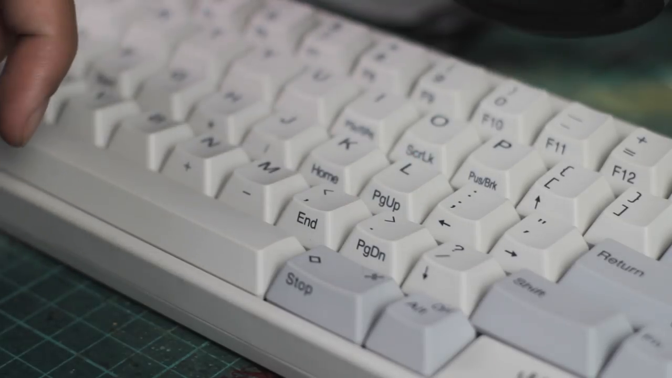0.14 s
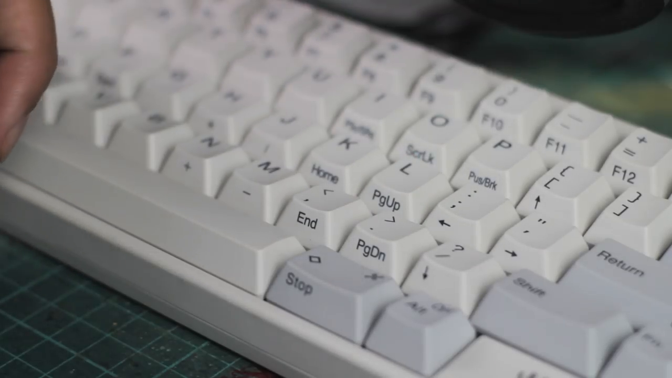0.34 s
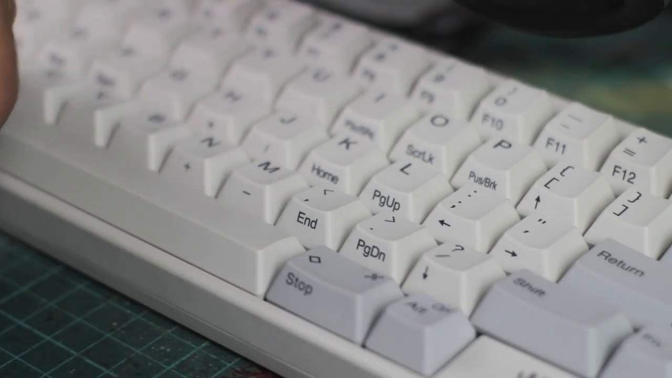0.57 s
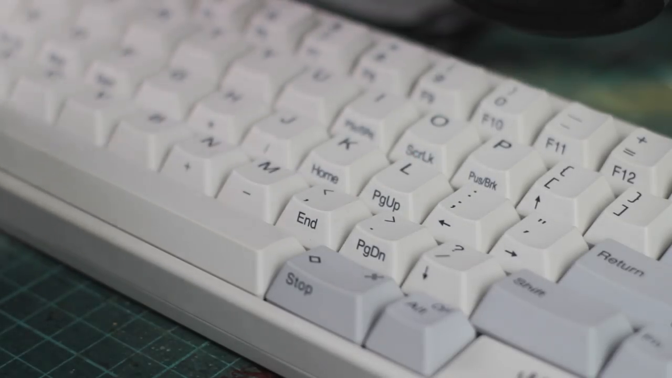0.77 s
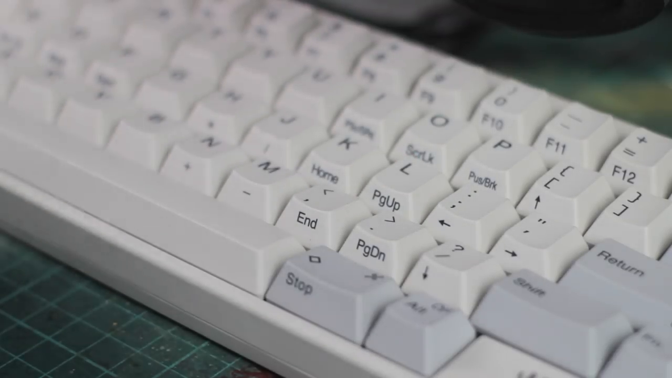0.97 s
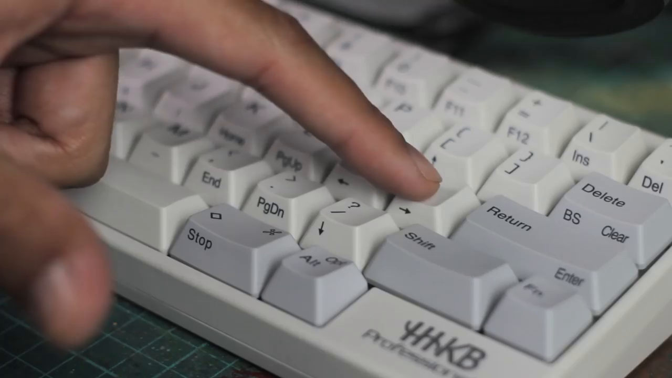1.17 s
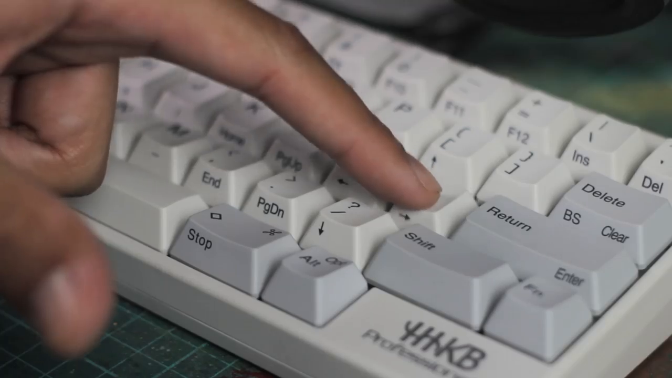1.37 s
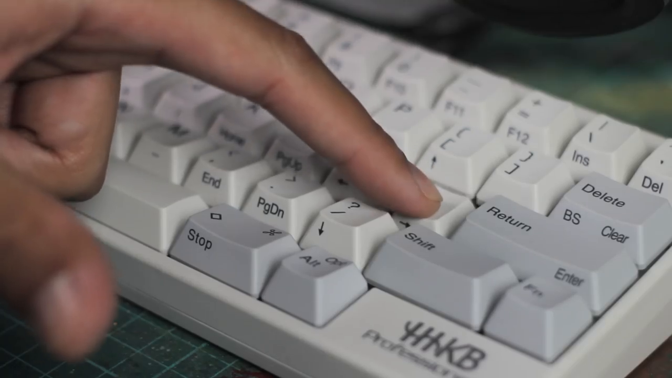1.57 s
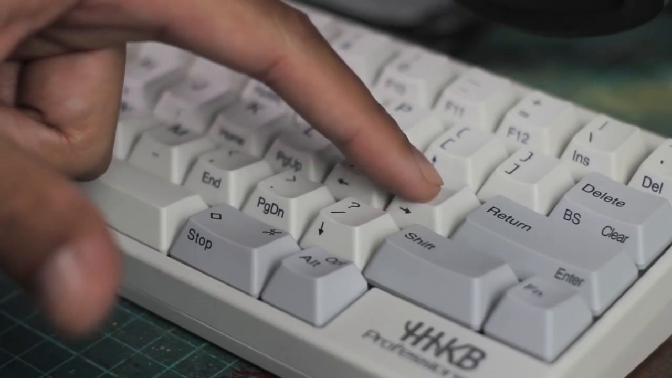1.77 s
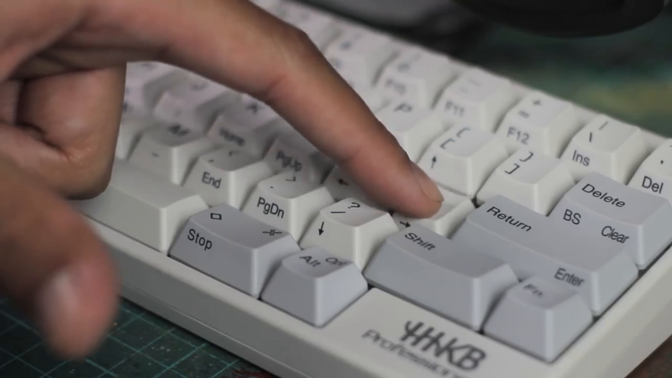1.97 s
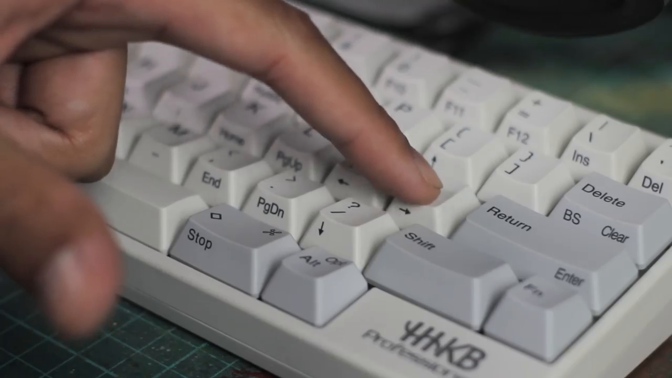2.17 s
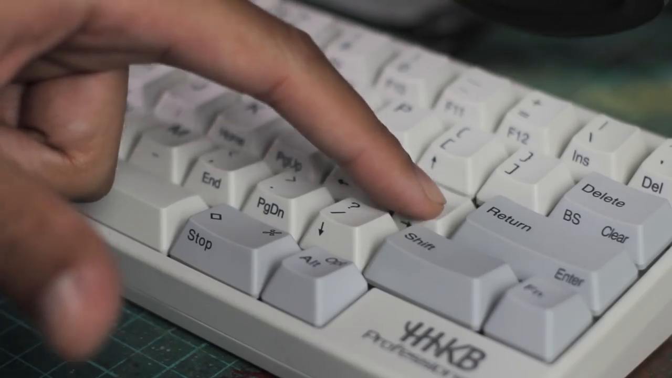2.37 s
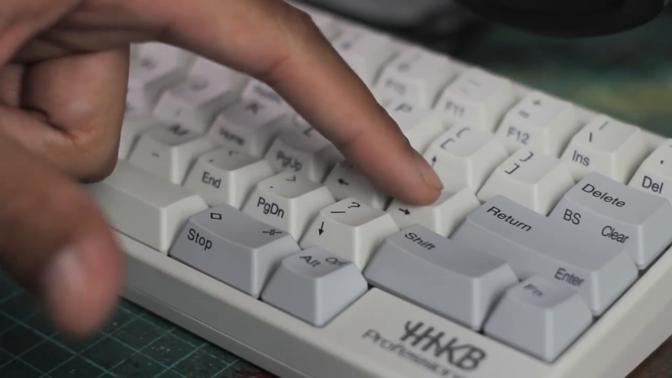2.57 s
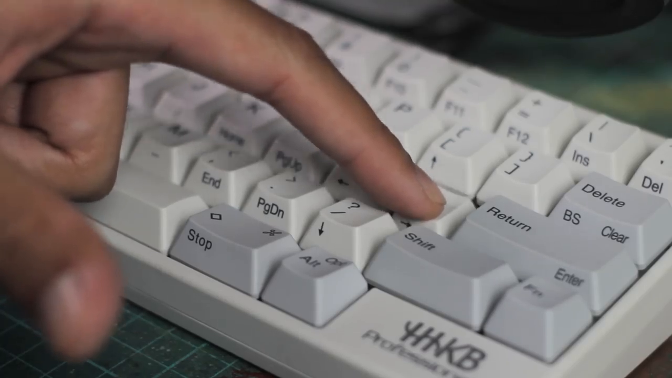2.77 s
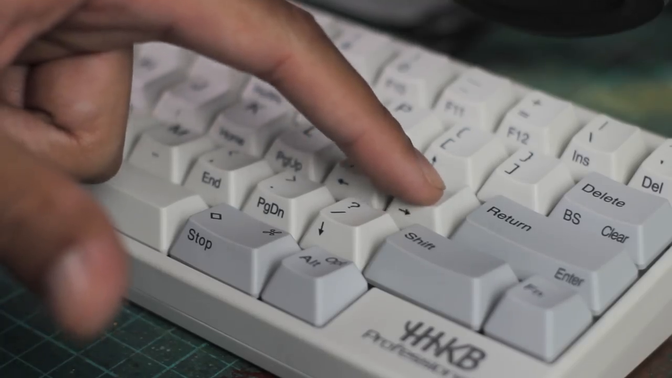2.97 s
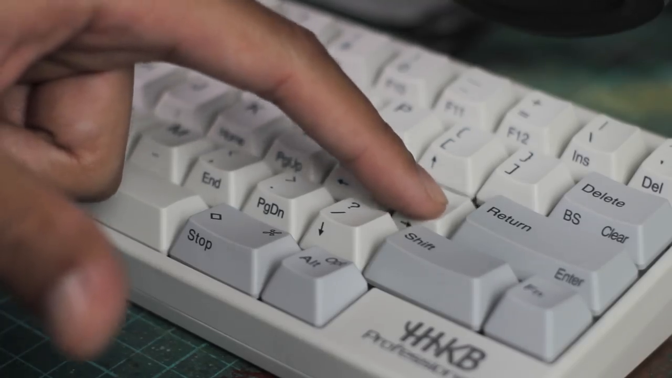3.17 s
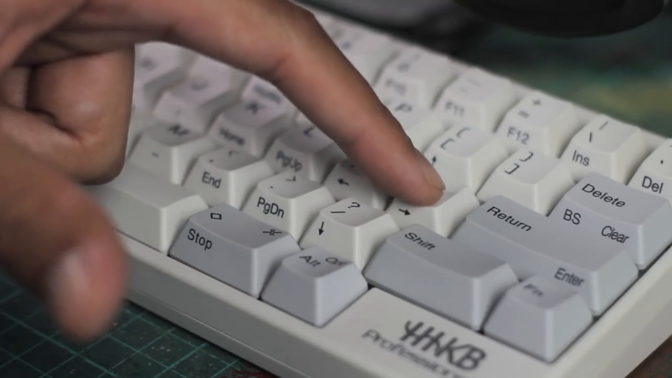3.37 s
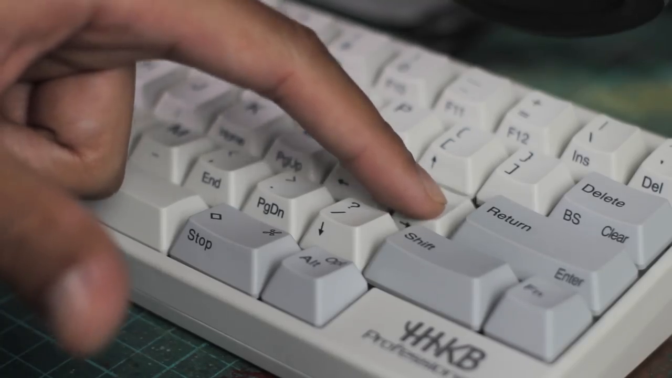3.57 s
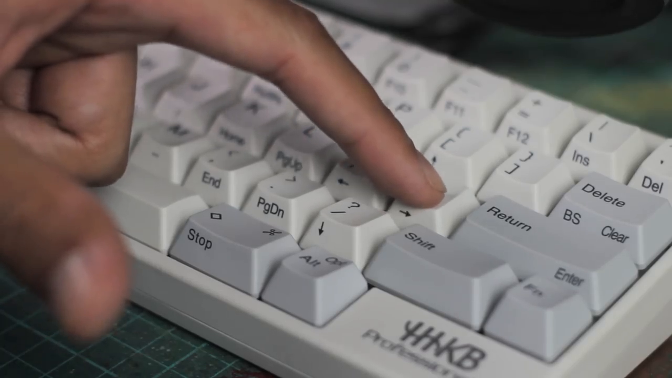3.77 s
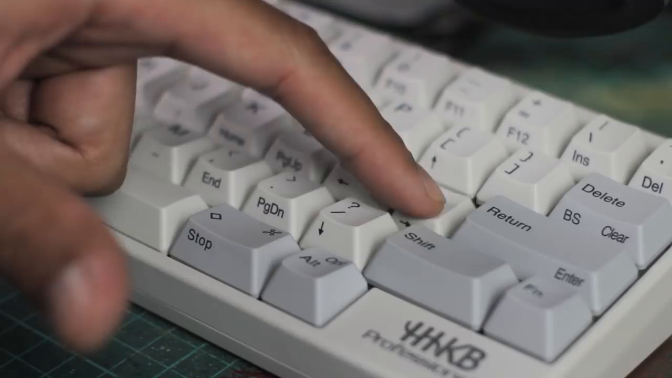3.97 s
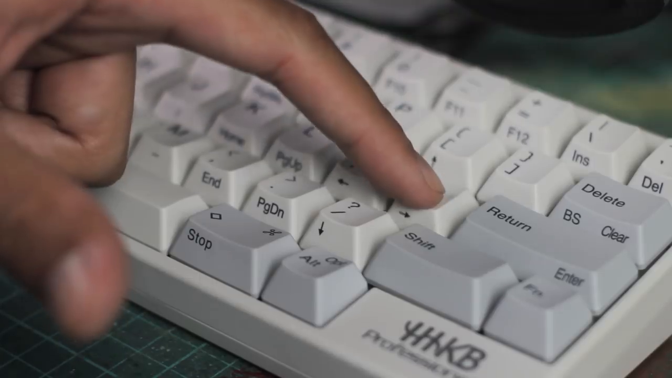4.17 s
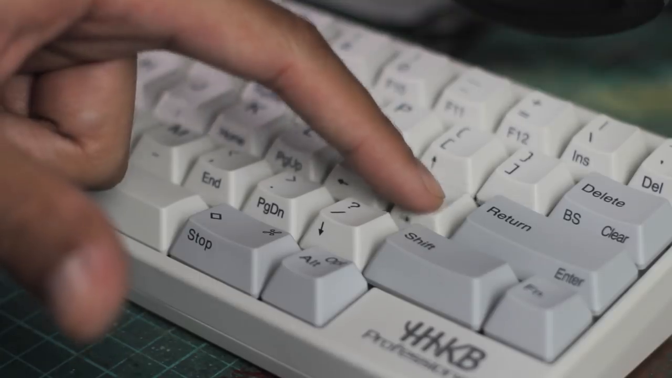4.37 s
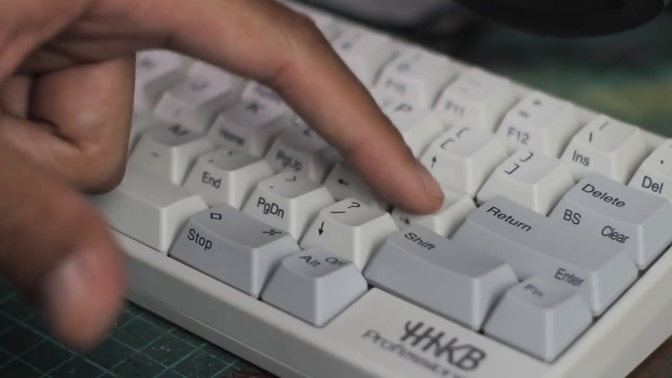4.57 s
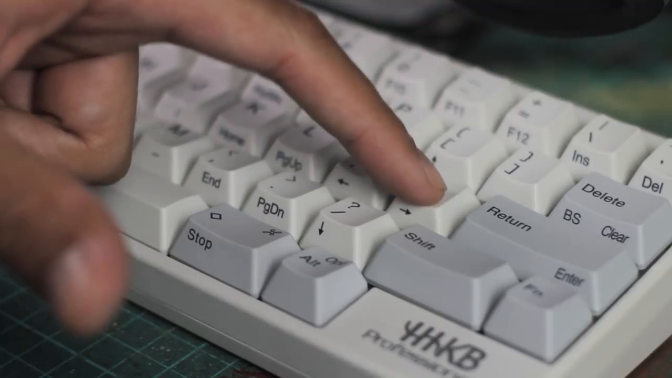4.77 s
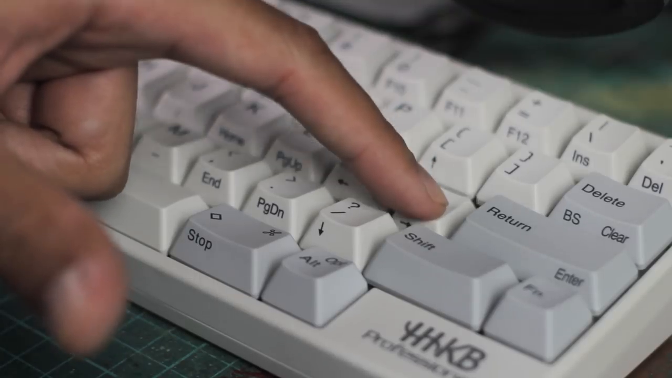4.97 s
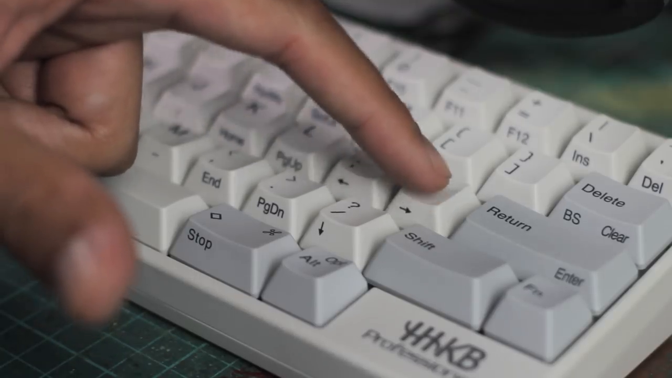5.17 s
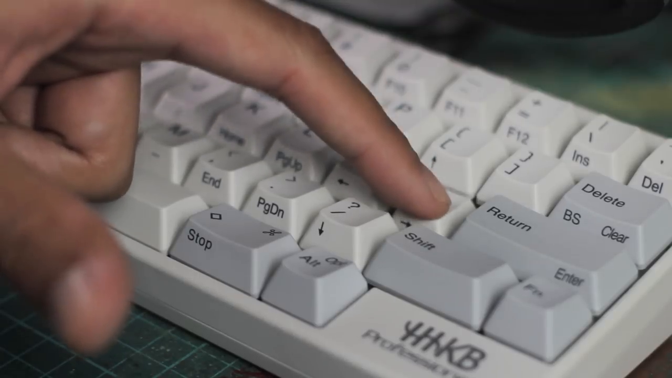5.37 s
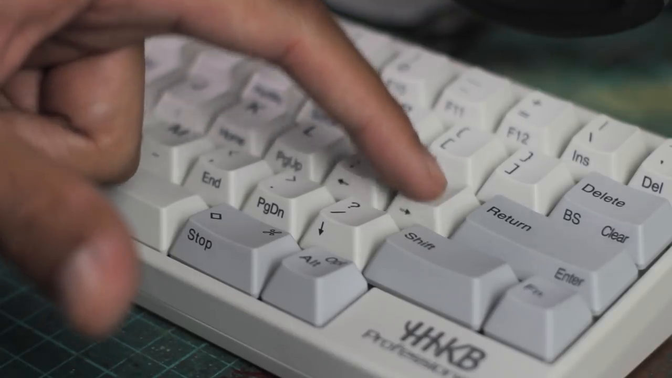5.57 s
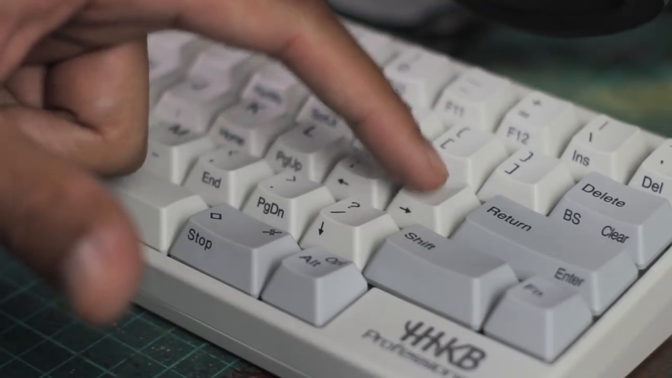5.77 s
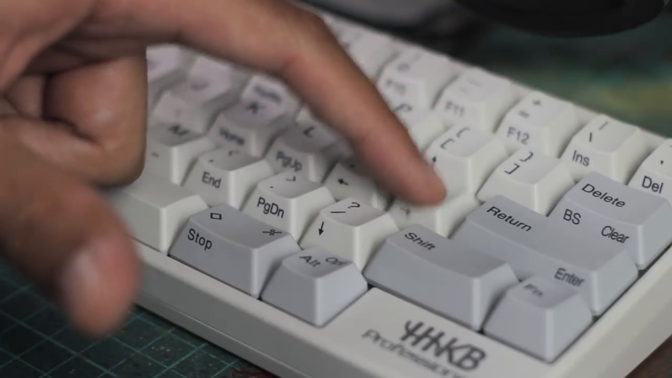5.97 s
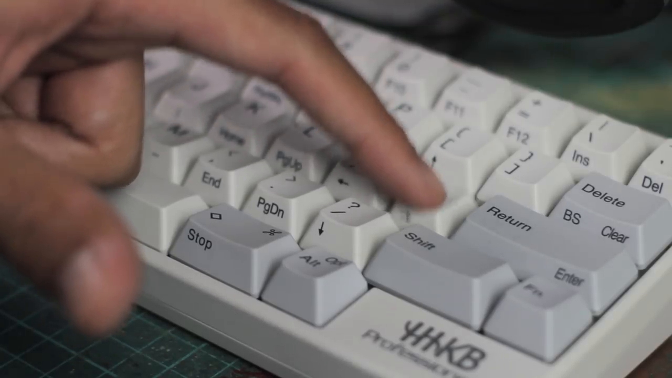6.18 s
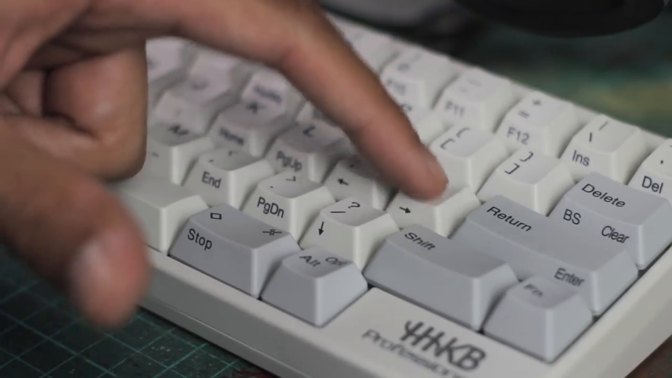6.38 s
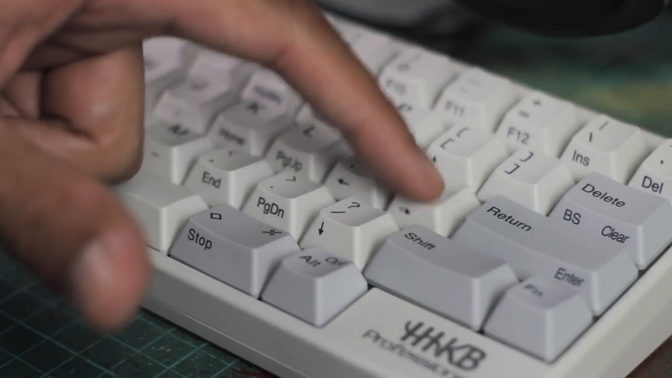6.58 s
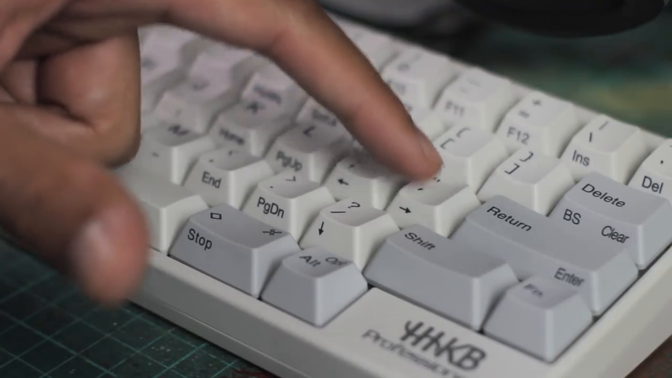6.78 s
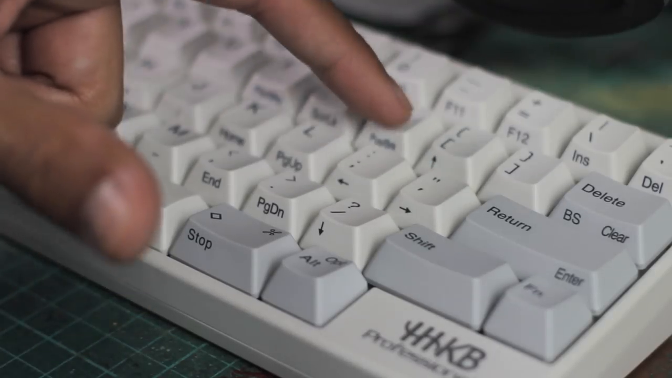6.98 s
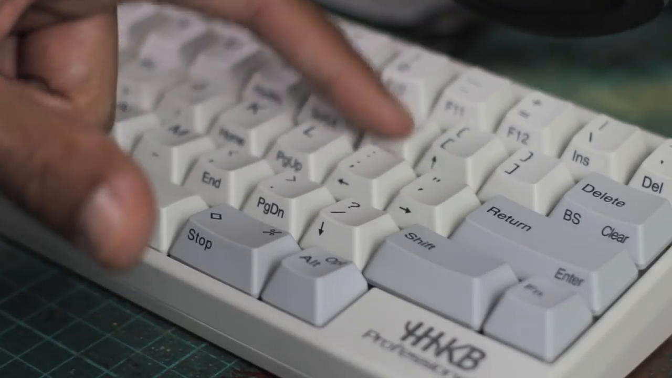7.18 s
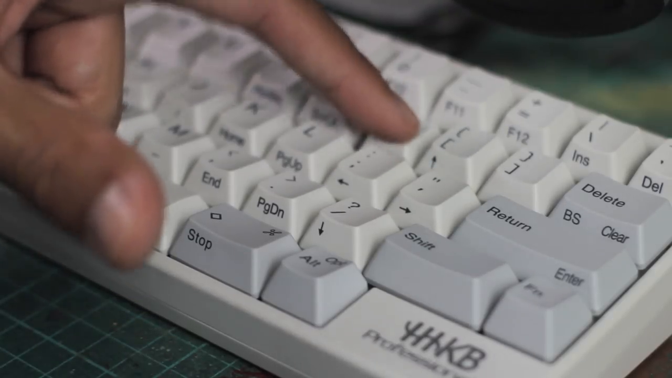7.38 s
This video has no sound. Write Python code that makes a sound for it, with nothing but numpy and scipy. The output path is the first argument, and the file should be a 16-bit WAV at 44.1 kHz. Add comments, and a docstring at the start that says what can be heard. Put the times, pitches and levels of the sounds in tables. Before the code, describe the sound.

Distant hoarse bird calls stop dead, then a close plastic key thuds and clacks at a steady pace, growing quicker and louder over low hum.

```python
"""Room noise and a far engine's drone come first, with three birds squawking outside until the sound
of calls and echo is cut off at 1.208 s. A hum joins as a finger starts pressing a plastic key close by:
friction slips of the stem on its way down, a modal thud as the rubber dome lands, then clicks and
bounces as struck modes of cap and case. Each press wobbles the desk; stem rubs, fingertip hiss and a
passing tyre wash are filtered noise. From 7 s on a second key is struck, with more damped high modes."""
import sys
import numpy as np
from scipy import signal
from scipy.fft import rfft, irfft, next_fast_len
from scipy.io import wavfile
from scipy.ndimage import uniform_filter1d

SR = 44100
rng = np.random.default_rng(int(sys.argv[2]) if len(sys.argv) > 2 else 0)


def invert_db(x):
    """Field ratio 10**(x/20) for x, a level in decibels (scalar or array-like)."""
    u = np.asarray(x, float) / 20
    return 10 ** u


def digitize_waveform(pressure):
    """Quantize a signal to 16-bit integers and store it at the path in sys.argv[1].

    Rows of a 2-D input are taken as channels; values are limited to [-1, 1].
    """
    field = np.atleast_2d(pressure).T
    bounded = np.clip(field, -1, 1)
    quanta = np.round(bounded * 32767).astype(np.int16)
    wavfile.write(sys.argv[1], SR, quanta)


N = 328104

# room noise and far traffic, relative power density: pitch_hz [Hz], level_db [dB per Hz]
AIR_SPECTRUM = [(12, -4.5), (25, 3), (42, -5), (58, -1), (120, -8), (220, -13.5), (500, -24), (1100, -30),
                (1800, -36), (4000, -44.5), (13000, -52), (15500, -90)]
# course of the engine: time_s [s], cycle_hz [Hz], effort_db [dB]
ENGINE_COURSE = [(0, 23.35, -45), (.5, 22.75, -50), (.8, 23.15, -62), (2.3, 22.9, -85), (3.3, 22.45, -54.5),
                 (4.1, 22.36, -51), (4.9, 22.35, -47.5), (5.44, 22.5, -38.5), (5.75, 22.27, -39.5),
                 (6.26, 21.58, -43.5), (6.8, 21.85, -55.5), (7.44, 21.53, -42.5)]
# engine partials: multiple of the cycle, level_db [dB at full effort], extra_loss [dB per dB below it]
ENGINE_PARTIALS = [(4, 1, 0.5), (5, -12, 0.5), (7, -8.5, 1.5)]
# calls, one table a bird: start_s [s], length_s [s], first_pitch_hz [Hz], level_db [dB], hoarseness [0-1]
BIRD_CALLS = [
    [(.105, 0.13, 1174, -52.5, 0.34), (.27, 0.12, 1135, -51.5, 0.5), (.485, .135, 1099, -50, .55),
     (.655, 0.14, 1225, -50.5, 0.32), (.7, 0.12, 1102, -48.5, .65), (.91, .13, 1143, -53, 0.6),
     (1.12, 0.092, 1168, -54, 0.1)],
    [(.79, 0.21, 1381, -46.5, 0.03), (.925, 0.11, 1345, -43.5, 0.4), (1.15, 0.16, 1307, -44, 0.39)],
    [(.37, 0.16, 1330, -61, 0.03), (.555, 0.17, 1948, -53.5, 0), (.69, 0.067, 1962, -58, 0.1)],
]
# relative resonance of each bird's throat and beak: pitch_hz [Hz], level_db [dB]
BEAK_SPECTRA = [
    [(700, -27), (1150, -9), (2250, -1.5), (3400, 4.5), (4700, -9), (6000, -13.5), (9000, -21.5),
     (15500, -36)],
    [(900, -20), (1360, -8.5), (2000, -1), (2730, 5.5), (4100, -6), (5500, -11), (6850, -6), (8200, -15),
     (15500, -31.5)],
    [(900, -46), (1330, 2.5), (1960, -1.5), (2700, -6), (3950, 6), (5400, -26), (6700, -6), (8000, -26),
     (15500, -33)],
]
# sinking of the pitch through a call, one value a bird: sag [Hz per s]
PITCH_SAG = [305, 115, 24]
# course of the hum before its pitch ratio is applied: time_s [s], pitch_hz [Hz], level_db [dB]
HUM_COURSE = [(1.18, 85.2, -51.5), (1.3, 83.5, -47), (1.9, 85.8, -49), (2.4, 82.6, -55), (2.9, 82.5, -45.5),
              (3.6, 82.74, -50.5), (4.9, 81.03, -51), (5.5, 81.64, -38.5), (6, 82.05, -41),
              (6.5, 79.75, -43.5), (6.95, 80, -37), (7.2, 81, -73.5)]
# modes of key and case before detuning and damping: pitch_hz [Hz], level_db [dB], t60_s [s]
KEY_MODES = [(683, -4, 0.024), (956, 1.5, 0.022), (1243, -6.5, 0.03), (1567, -8, 0.036),
             (1910, -6.5, 0.022), (2656, -1, 0.011), (3160, -7, 0.018), (3370, -3, 0.024),
             (3730, -6.5, 0.013), (5170, -9, 0.024), (6090, -0.5, 0.0067), (6182, -1.5, 0.017),
             (7500, -33, 0.015), (8790, -16, 0.023), (10220, -19, 0.014), (12600, -21.5, 0.011),
             (14940, -13.5, 0.0026)]
# bright key clicks, mostly as the finger lets the cap rise, some at the end of a downstroke:
# start_s [s], peak_db [dB]
BRIGHT_CLICKS = [(1.36, -45), (1.573, -44.5), (2.0387, -70), (2.404, -37), (2.8092, -34.5), (3.1819, -35.5),
                 (3.5581, -35.5), (3.937, -42), (4.31, -34), (4.6726, -37), (5.0227, -36.5),
                 (5.3667, -35.5), (5.6556, -41), (5.8079, -50), (5.835, -37), (5.9104, -31), (6.022, -45),
                 (6.1176, -34.5), (6.1441, -25), (6.292, -32), (6.403, -36.5), (6.4599, -33),
                 (6.6396, -30.5), (7.103, -50), (7.2098, -23), (7.337, -33.5)]
# dull ticks of the fingertip landing on the cap or the cap shifting under it: start_s [s], peak_db [dB]
DULL_TICKS = [(2.254, -42.5), (2.379, -56), (2.7893, -63), (3.1643, -45), (3.2122, -35.5), (3.537, -44.5),
              (3.5846, -39.5), (3.9148, -44), (4.4707, -49), (4.995, -52), (5.045, -46), (5.0838, -37.5),
              (5.5298, -48), (5.5591, -30), (5.8147, -32.5), (5.8548, -33), (5.8832, -57), (5.8983, -36.5),
              (5.9263, -42), (6.048, -28), (6.069, -38), (6.1055, -34.5), (6.2048, -27.5), (6.2829, -36),
              (6.3754, -26), (6.4467, -42), (6.5411, -30.5), (6.6127, -45), (7.1504, -40), (7.2644, -37.5),
              (7.3154, -33.5), (7.405, -37)]
# key snapping home at the top: start_s [s], peak_db [dB], bounce_gap_s [s],
# first_bounce_db [dB relative to the clack, before scatter], graze_db [dB, peak of the graze before it]
TOP_CLACKS = [(2.0699, -34, .005, -13, -60), (2.0733, -31, .005, -20, -62), (2.4414, -51, .005, -14, -45),
              (2.8567, -28, 0.0047, -20, -32), (3.2473, -45.5, 0.0042, -19, -60),
              (3.6275, -46, .005, -14, -36.5), (3.6315, -34, .005, -24, -60),
              (4.0039, -39.5, .005, -27, -56), (4.3828, -39, 0.004, -32, -67),
              (4.7451, -31, 0.0043, -16, -62), (5.0877, -35.5, 0.0047, -14.5, -65),
              (5.4137, -19, 0.0048, -8, -27.5), (5.7072, -20, .004, -3.5, -36.5),
              (5.7185, -24.5, 0.0036, -8, -60), (5.948, -17.5, 0.0048, -7.5, -29.5),
              (6.1516, -13.5, .0051, -9, -32), (6.3274, -13, .005, -10.5, -30.5),
              (6.4967, -14.5, 0.0049, -11, -36), (6.685, -17.5, 0.0056, -4.5, -39),
              (7.2283, -34, .006, -18, -60), (7.2518, -29.5, .0058, -29, -54),
              (7.408, -22, 0.0073, -19.5, -59)]
# colour of each kind of contact, soft to hard: peak_db [dB], case_share_db [dB], bright_share_db [dB]
CLACK_SHARES = [(-35.5, 4, -8), (-22.5, -17, -0.5)]
BOUNCE_SHARES = [(-39, 7.5, -12), (-31.5, -6.5, -10)]
CLICK_SHARES = [(-36, -10, 2.45), (-32.5, -11, 6.6)]
TICK_SHARES = [(-43, -2.5, -24), (-28, -15.5, -13.5)]
# downstrokes: end_s [s], thud_db [dB], slide_db [dB], desk_wobble_db [dB]
DOWNSTROKES = [(1.364, -37, -59.5, -36), (1.896, -40.5, -60.5, -38.5), (2.28, -41, -60, -39.5),
               (2.692, -37, -62, -39.5), (3.072, -43, -59.5, -37), (3.45, -39, -63, -36),
               (3.823, -44, -60, -39), (4.183, -41, -63.5, -39), (4.55, -46, -62, -36.5),
               (4.904, -55, -59, -40.5), (5.261, -44, -59.5, -36.5), (5.576, -33.5, -53, -39),
               (5.847, -34.5, -49.5, -30.5), (6.059, -29.5, -52.5, -37.5), (6.241, -32.5, -48.5, -44),
               (6.413, -34, -49.5, -30.5), (6.577, -36.5, -51.5, -32), (7.143, -28, -52, -31.5),
               (7.33, -26, -52.5, -39)]
# rubs on the way up: start_s [s], level_db [dB]
UPWARD_RUBS = [(1.609, -65.5), (2.02, -61), (2.425, -64), (3.201, -61), (3.575, -57.5), (3.95, -60),
               (4.326, -62.5), (4.695, -64), (5.04, -62.5), (7.221, -53), (7.415, -57.5)]
# fingertip brushes: start_s [s], length_s [s], level_db [dB]
FINGER_BRUSHES = [(3.69, 0.16, -82), (6.697, 0.23, -76)]
# passing vehicle: peak_s [s], half_width_s [s], level_db [dB]
PASSING_VEHICLE = (4.27, 0.4, -66)

AIR_DB, AIR_SWELL_DB = -49, 0.4
FULL_EFFORT_DB = -38
CALLS_CUT_S = 1.208
HOLD_SHARE, START_DB, FADE_DB = 0.25, 0.5, -16.5  # share of a call held; its ends relative to the hold
HOARSE_ENDS = 0.98  # hoarseness factor at both ends of a call
HUM_RATIO = 0.97  # factor on the hum's pitch
FIDGET_COUNT, FIDGET_SPREAD_S, FIDGET_DB, FIDGET_SCATTER_DB = 5, 0.06, -17, 2.5  # about each bright click
BOUNCE_COUNT, BOUNCE_LOSS_DB = 4, -2.5  # further loss at each later bounce
BOUNCE_SCATTER_DB, BOUNCE_SCATTER_S = 4.5, 0.00048
GRAZE_LEAD_S = 0.0101
OTHER_KEY_S = 7
STROKE_S, RISE_S = 0.028, 0.046
SLIDE_GRIT_DB, RISE_GRIT_DB = -9, -20  # treble of the slips heard directly
DESK_HZ, DESK_PEAK_S, DESK_SHARPNESS = 30, 0.11, 1.22
KEY_ROOM_DB = -18


def evened(x):
    """Normalization: a signal divided by its rms has unit power."""
    return x / np.sqrt(np.mean(x ** 2) + 1e-20)


def read(points, hz):
    """Logarithmic pitch scale: a spectrum is interpolated evenly in log frequency."""
    f, value = np.transpose(points)
    return np.interp(np.log(hz + 1), np.log(f + 1), value)


def add(mix, s, sound):
    """Superposition: a sound starting at time s adds linearly to the mix."""
    part = mix[round(s * SR):][:len(sound)]
    part += sound[:len(part)]


def colour(x, points):
    """Linear filtering: each frequency component is scaled by a given spectrum."""
    size = next_fast_len(len(x))
    gain = invert_db(read(points, np.fft.rfftfreq(size, 1 / SR)))
    return irfft(rfft(x, size) * gain, size)[:len(x)]


def room(x, t60, first_s):
    """Reverberation: sparse reflections of random sign decay exponentially."""
    slots = np.arange(round(first_s * SR), SR // 2, 22)
    at = slots + rng.integers(0, 22, len(slots))
    reflections = np.zeros(SR // 2 + 22)
    reflections[at] = rng.choice([-1., 1.], len(at)) * invert_db(-60 * at / SR / t60)
    return signal.fftconvolve(x, reflections / np.linalg.norm(reflections))[:N]


def tone(rows, orders):
    """Harmonic synthesis: sines on multiples of a drifting pitch, each with its own loss at low effort."""
    s, hz, db = np.transpose(rows)
    t = np.arange(N) / SR
    turns = np.cumsum(np.interp(t, s, hz)) / SR
    level_db = np.interp(t, s, db, left=-100)
    out = np.zeros(N)
    for multiple, order_db, extra in orders:
        partial_db = level_db + order_db + extra * (level_db - FULL_EFFORT_DB)
        out += invert_db(partial_db) * np.sin(2 * np.pi * (multiple * turns + rng.random()))
    return np.sqrt(2) * out


def air():
    """Broadband noise: filtered noise of room and far traffic under a slow random swell."""
    t = np.arange(N) / SR
    swell = evened(sum(np.sin(2 * np.pi * (f * t + rng.random())) / np.sqrt(f)
                       for f in np.geomspace(0.2, 5, 20)))
    return invert_db(AIR_DB + AIR_SWELL_DB * swell) * evened(colour(rng.standard_normal(N), AIR_SPECTRUM))


def engine():
    """Periodic excitation: a far engine sounds at multiples of its cycle rate."""
    return tone(ENGINE_COURSE, ENGINE_PARTIALS)


def squawk(rows, bird, start_hz, end_hz):
    """Source and filter: wavering, breath-roughened pulses excite the resonances of throat and beak."""
    s, *columns = np.transpose(rows)
    t = np.arange(s[0], s[-1], 1 / SR)
    db, hoarse = (np.interp(t, s, c) for c in columns)
    hoarse = np.clip(hoarse, 0, 1)
    hz = np.linspace(start_hz, end_hz, len(t))
    half = 1.9 * hoarse * (bird == 1)  # this bird breaks into half pitch when hoarse
    waver, hiss = rng.standard_normal((2, 16000))[:, :len(t)]
    waver_depth = 0.0092 + 0.053 * hoarse
    turns = np.cumsum(hz * (1 + waver_depth * evened(uniform_filter1d(waver, 260)))) / SR
    folds = sum((half if k % 2 else 1) * np.cos(np.pi * k * turns) * (k * hz < 31000)
                for k in range(1, 25))
    # uneven pulses smear each partial
    puffs = evened(folds) * evened(uniform_filter1d(hiss, 90)) + 0.22 * hiss
    drive = (1 - hoarse) * evened(folds) + hoarse * evened(puffs)
    voice = evened(colour(drive, BEAK_SPECTRA[bird]))
    return s[0], invert_db(db) * voice * signal.windows.tukey(len(t), 0.25)


def birds():
    """Direct and reflected sound: calls hold, fade and sink, blurred by walls; a cut silences call and echo."""
    direct = np.zeros(N)
    for bird, calls in enumerate(BIRD_CALLS):
        for s, length, hz, db, hoarse in calls:
            rows = [(s, db + START_DB, hoarse * HOARSE_ENDS),
                    (s + HOLD_SHARE * length, db, hoarse),
                    (s + length, db + FADE_DB, hoarse * HOARSE_ENDS)]
            add(direct, *squawk(rows, bird, hz, hz - PITCH_SAG[bird] * length))
    heard = direct + invert_db(0.5) * room(direct, 0.38, 0.0039)
    return heard * np.clip((CALLS_CUT_S - np.arange(N) / SR) / 0.0027, 0, 1)


def hum():
    """Pure tone: a single sine of drifting pitch and level."""
    return tone(HUM_COURSE, [(HUM_RATIO, 0, 0)])


def ring(case_db, bright_db, damping, luck):
    """Modal synthesis: one contact excites low case modes and high bright modes by separate shares."""
    hz, db, t60 = np.transpose(KEY_MODES)[:, :, None]
    share_db = read([(1300, case_db), (2400, 0.024), (4200, 0.039), (5500, bright_db)], hz)
    t = np.arange(1400) / SR
    detune = 1 + 0.02 * luck[:, :1]
    spot = 0.5 * luck[:, 1:] + np.sign(luck[:, 1:])  # the spot struck sets sign and strength
    rise = 1 - np.exp(-t * hz / 0.45)  # low modes build more slowly
    # the finger on the cap damps the high modes more than the case
    fall_db = 60 * t / t60 * damping ** np.clip(hz / 3000, 0, 1)
    modes = spot * rise * invert_db(db + share_db - fall_db) * np.sin(2 * np.pi * hz * detune * t)
    return modes.sum(0)


def fidgets():
    """Random impacts: the loose cap ticks faintly at chance moments around each bright click."""
    chance = rng.standard_normal((len(BRIGHT_CLICKS), FIDGET_COUNT, 2))
    return [(s + FIDGET_SPREAD_S * a, db + FIDGET_DB + FIDGET_SCATTER_DB * b)
            for (s, db), luck in zip(BRIGHT_CLICKS, chance) for a, b in luck]


def coloured(rows, shares):
    """Contact hardness: the strength of a contact sets its shares of case and bright modes."""
    level_db, case_db, bright_db = np.transpose(shares)
    return [(s, db, np.interp(db, level_db, case_db), np.interp(db, level_db, bright_db))
            for s, db in rows]


def contacts():
    """Repeated impact: clacks follow a graze and rebound in weakening, uneven bounces; clicks and ticks join."""
    chance = rng.standard_normal((len(TOP_CLACKS), BOUNCE_COUNT, 2))
    bounces = []
    for (s, db, gap_s, below_db, _), luck in zip(TOP_CLACKS, chance):
        for k, (a, b) in enumerate(luck):
            bounce_s = s + (k + 1) * gap_s + BOUNCE_SCATTER_S * a
            bounces.append((bounce_s, db + below_db + k * BOUNCE_LOSS_DB + BOUNCE_SCATTER_DB * b))
    grazes = [(row[0] - GRAZE_LEAD_S, row[-1]) for row in TOP_CLACKS]
    clacks = [row[:2] for row in TOP_CLACKS]
    return (coloured(clacks, CLACK_SHARES) + coloured(bounces, BOUNCE_SHARES)
            + coloured(BRIGHT_CLICKS, CLICK_SHARES) + coloured(DULL_TICKS + grazes + fidgets(), TICK_SHARES))


def ticks():
    """Modal damping: each contact strikes its own spot; under a resting finger light ones die drier."""
    rows = contacts()
    out = np.zeros(N)
    chance = rng.standard_normal((len(rows), len(KEY_MODES), 2))
    for (s, db, case_db, bright_db), luck in zip(rows, chance):
        damping = np.interp(db, [-36, -23], [3.2, 2.1]) if s < OTHER_KEY_S else 4.5
        sound = ring(case_db, bright_db, damping, luck)
        add(out, s, invert_db(db) * sound / abs(sound).max())
    return out


def rub(shape, grit_db):
    """Friction: a shower of uneven slips under a pressure shape drives the damped key and is heard directly."""
    body = ring(-6, -4, 5, rng.standard_normal((len(KEY_MODES), 2)))
    grit = rng.standard_normal((5000, 2))[:len(shape)]
    slips = np.pad(grit[:, 0] * invert_db(6.6 * grit[:, 1]) * shape, (0, 300))
    through_key = evened(signal.fftconvolve(slips, body)[:len(slips)])
    direct = evened(colour(slips, [(4000, -10), (8800, 1), (12500, -3.5), (15500, -9)]))
    return through_key + invert_db(grit_db) * direct


def strokes():
    """Friction, then impact: the stem rubs ever harder, and the landing dome shakes the lowest modes."""
    out, t = np.zeros(N), np.arange(2000) / SR
    for s, thud_db, slide_db, _ in DOWNSTROKES:
        pressure = np.linspace(0, 1, round(STROKE_S * SR)) ** 0.52
        add(out, s - STROKE_S, invert_db(slide_db) * rub(pressure, SLIDE_GRIT_DB))
        # each mode is lowered by a random ratio
        thud = sum(invert_db(db - 60 * t / t60) * np.sin(2 * np.pi * hz * rng.uniform(0.572, 1) * t)
                   for hz, db, t60 in KEY_MODES[:3])
        onset = np.minimum(t / 0.00054, 1)
        add(out, s, invert_db(thud_db) * thud * onset / abs(thud).max())
    return out


def desk():
    """Forced vibration: the desk wobbles at its lowest mode, swelling after each press and dying away."""
    t, swell = np.arange(N) / SR, np.zeros(N)
    u = np.arange(SR) / SR / DESK_PEAK_S
    for s, *_, db in DOWNSTROKES:
        add(swell, s, invert_db(db) * (u * np.exp(1 - u)) ** DESK_SHARPNESS)
    return np.sqrt(2) * swell * np.sin(2 * np.pi * (DESK_HZ * t + rng.random()))


def scuffs():
    """Sliding friction: the stem rubs again as the key rises."""
    out = np.zeros(N)
    for s, db in UPWARD_RUBS:
        pressure = signal.windows.tukey(round(RISE_S * SR), 0.7)
        add(out, s, invert_db(db) * rub(pressure, RISE_GRIT_DB))
    return out


def brushes():
    """Friction noise: a fingertip on the textured cap gives a faint, band-limited high hiss."""
    out = np.zeros(N)
    for s, length, db in FINGER_BRUSHES:
        hiss = colour(rng.standard_normal(16000),
                      [(3800, -29), (5100, -1), (5600, -6), (6250, 3), (7400, -46)])
        fade = signal.windows.tukey(round(length * SR), 0.6)
        add(out, s, invert_db(db) * fade * evened(hiss)[:len(fade)])
    return out


def traffic():
    """Passing source: a far vehicle's band of tyre noise swells and fades along a bell curve."""
    s, width_s, db = PASSING_VEHICLE
    wash = evened(colour(rng.standard_normal(N),
                         [(300, -21), (600, -3), (1000, 8), (1400, -9.5), (2500, -43.0)]))
    return invert_db(db) * wash * np.exp(-((np.arange(N) / SR - s) / width_s) ** 2)


def scene():
    """Superposition: the key and its room reflections sound close by, over the fainter surroundings."""
    key = ticks() + strokes() + scuffs()
    key_room = invert_db(KEY_ROOM_DB) * room(key, 0.08, 0.0038)
    low = desk() + hum() + engine()
    return (key + key_room + brushes() + birds() + low + traffic() + air())[None]


def top_cut(x):
    """Nothing passes above the cut-off."""
    return signal.sosfilt(signal.butter(12, 15930, fs=SR, output="sos"), x)


def record(dry):
    """Band limitation: a linear-phase low-pass removes the spectrum above 15.9 kHz."""
    limited = signal.oaconvolve(dry, signal.firwin(255, 15900, fs=SR)[None], "same")
    return top_cut(limited)


dry = scene()
out = record(dry)
digitize_waveform(out)
```